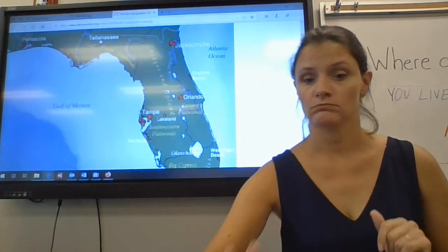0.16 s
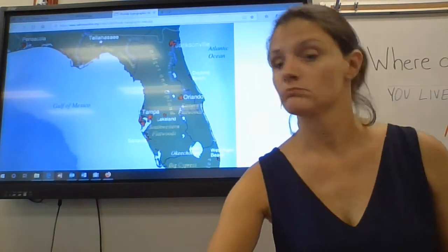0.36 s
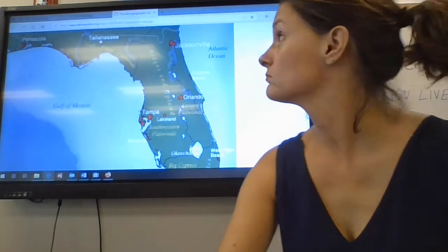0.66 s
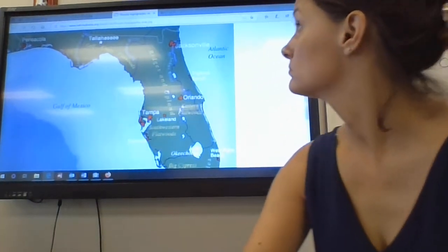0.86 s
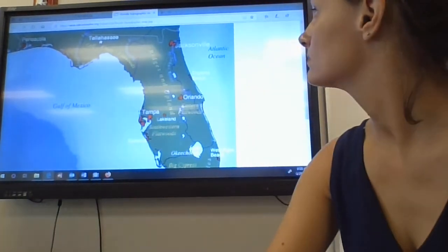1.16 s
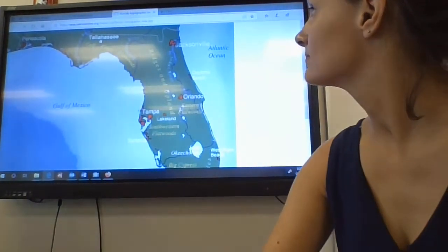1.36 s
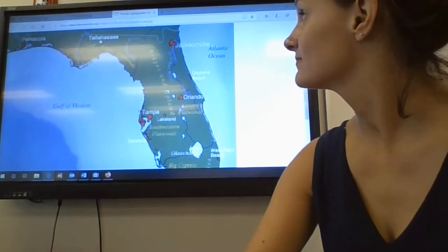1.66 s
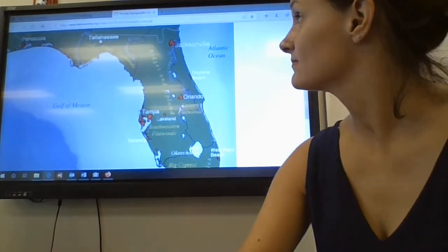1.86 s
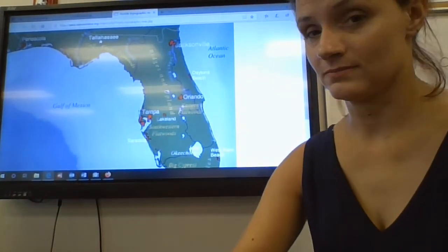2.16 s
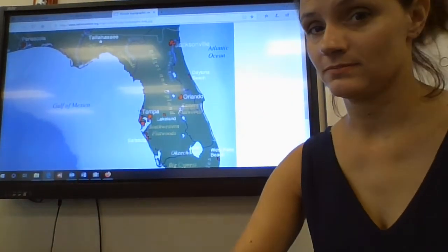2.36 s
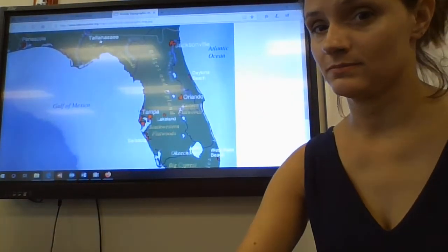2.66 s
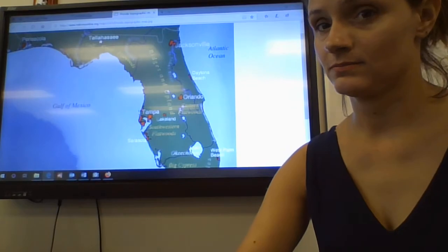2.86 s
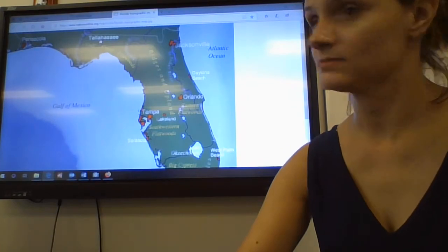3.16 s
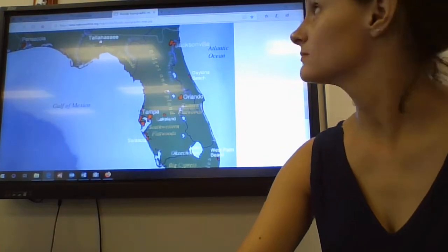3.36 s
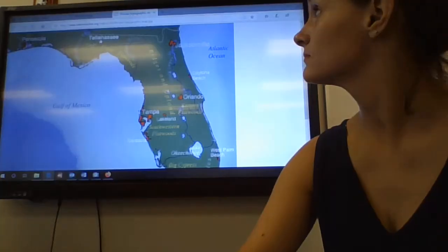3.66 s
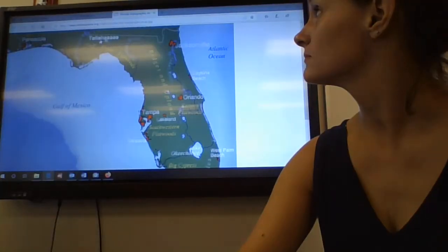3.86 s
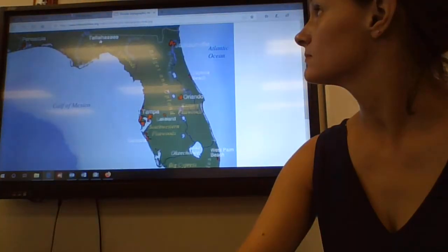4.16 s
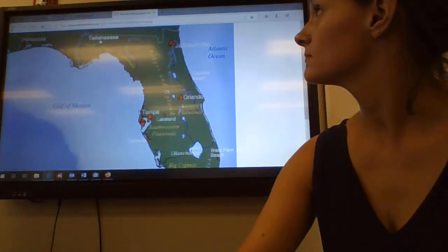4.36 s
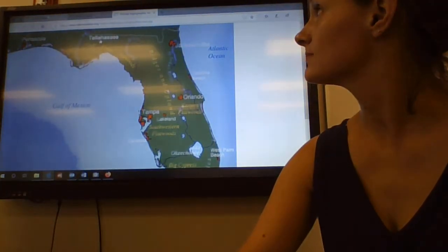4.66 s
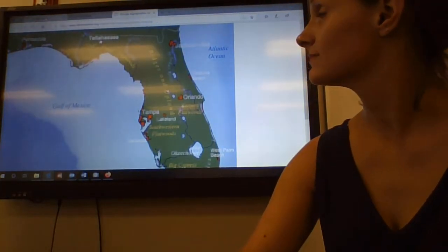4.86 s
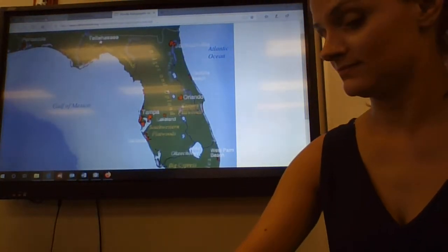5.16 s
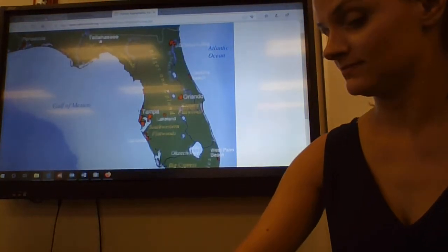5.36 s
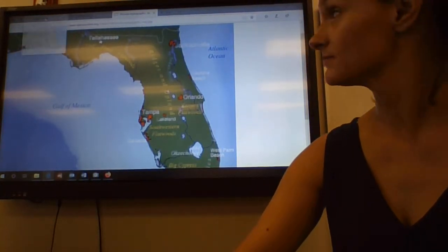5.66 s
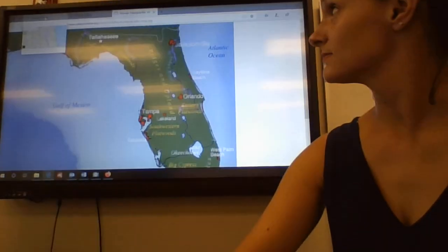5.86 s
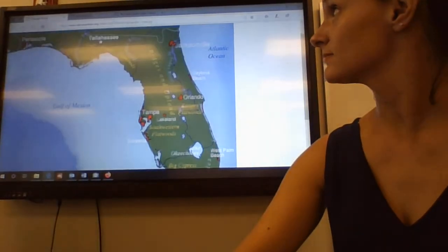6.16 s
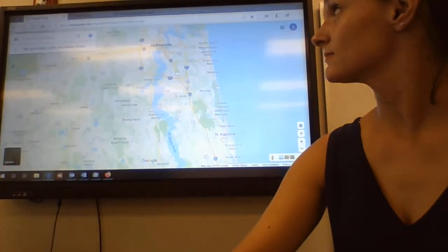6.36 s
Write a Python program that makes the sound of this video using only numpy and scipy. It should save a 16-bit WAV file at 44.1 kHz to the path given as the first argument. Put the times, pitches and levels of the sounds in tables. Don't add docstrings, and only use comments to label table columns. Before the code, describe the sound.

A laptop's own microphone picks up its steady low-mid fan hum, soft airy rush, thin high whine and tiny rapid ticks in a quiet classroom. A hand lightly taps and rubs the case, with dull thuds around one, two and three seconds. After a quieter stretch, a small snap leads to a loud, sharp double knock near the end, then the fan continues.

```python
import sys
import numpy as np
from scipy import signal
from scipy.fft import rfft, irfft, next_fast_len
from scipy.io import wavfile
from scipy.ndimage import uniform_filter1d, map_coordinates

SR = 44100
rng = np.random.default_rng(int(sys.argv[2]) if len(sys.argv) > 2 else 0)


def digitize_waveform(pressure):
    field = np.atleast_2d(pressure).T
    bounded = np.clip(field, -1, 1)
    quanta = np.round(bounded * 32767).astype(np.int16)
    wavfile.write(sys.argv[1], SR, quanta)


def boost_factor(decibels):
    exponent = np.asarray(decibels, float) / 20
    return 10 ** exponent


N = 287532


def unit(x):
    return x / np.sqrt(np.mean(x ** 2) + 1e-20)


def wobble(rate):
    knots = rng.standard_normal(int(N * rate / SR) + 4)
    return map_coordinates(knots, [np.arange(N) * rate / SR])


def filtered(x, response):
    m = next_fast_len(N + SR // 2)
    hz = np.fft.rfftfreq(m, 1 / SR)
    return irfft(rfft(x, m) * response(hz), m)[:N]


def resonances(peaks):
    def response(f):
        total = 0
        for k, (hz, width, db) in enumerate(peaks):
            total = total + (-1) ** k * boost_factor(db) * 1j * f * width / (hz * hz - f * f + 1j * f * width)
        return total
    return response


def rise_and_ring(t, rise_s, t60_s, db):
    return boost_factor(db - 60 * t / t60_s) * (1 - np.exp(-t / rise_s)) ** 2


def fan_tones():
    # time_s, pitch_hz
    fan_speed = [(0, 282.7), (.7, 282.6), (1.1, 281.1), (1.5, 281.8), (2.0, 281.2), (2.6, 282.6),
                 (3.1, 281.2), (3.6, 281.6), (4.3, 281.7), (4.9, 280.3), (5.5, 281.6), (6.52, 281.4)]
    # multiple, level_db
    multiples = [(1, -26), (2, -33), (3, -31.5), (4, 0.5), (5, -23.5), (6, -14.5), (7, -20), (8, -13),
                 (9, -24), (10, -40), (11, -32.5), (12, -21), (13, -21), (14, -35), (15, -29), (16, -40.5),
                 (17, -37)]
    time_s, pitch_hz = np.transpose(fan_speed)
    fourth_hz = np.interp(np.arange(N) / SR, time_s, pitch_hz) + 0.5 * wobble(6.9)
    turn = 2 * np.pi * np.cumsum(fourth_hz) / (4 * SR)
    tones = np.zeros(N)
    for k, db in multiples:
        tones += boost_factor(db + 0.8 * wobble(8.4)) * np.sin(k * turn + rng.uniform(0, 2 * np.pi))
    return boost_factor(-49.5) * tones


def air_rush():
    # pitch_hz, level_db (per Hz)
    air_colour = [(32, -13.5), (55, -20), (90, -5.5), (150, -3), (230, -2), (450, -2), (700, -8),
                  (1050, -11), (1350, -14), (2500, -19), (2900, -25.5), (6000, -32.5), (11000, -32.5),
                  (14500, -29.5)]
    hz, db = np.transpose(air_colour)
    noise = rng.standard_normal(N)
    air = unit(filtered(noise, lambda f: boost_factor(np.interp(np.log(f + 1), np.log(hz), db))))
    return boost_factor(-64.5 + 0.604 * wobble(6.6)) * air


def converter_whine():
    phase = 2 * np.pi * 14446 * np.arange(N) / SR + 0.3 * wobble(30)
    return boost_factor(-83 + 1.1 * wobble(9.5)) * np.sin(phase)


def converter_sizzle():
    _, _, z = signal.stft(rng.standard_normal(N), SR, nperseg=256)
    field = uniform_filter1d(rng.standard_normal(z.shape), size=8, axis=0)
    field = uniform_filter1d(field, size=14, axis=1)
    patches = signal.istft(z * boost_factor(4.8 * unit(field)), SR, nperseg=256)[1][:N]
    return boost_factor(-82.5) * unit(filtered(patches, resonances([(13100, 3800, 0)])))


def electrical_ticks():
    # pitch_hz, width_hz, level_db
    tick_colour = [(3400, 940, 4.5), (4580, 1250, 6), (7360, 660, 8.5), (12100, 1500, -3)]
    clock_hz, due_hz = 185.92, 83.1
    start_s, lag_beats = 3.9005, 0.65
    first, last = -int(start_s * due_hz), int((N / SR - start_s) * due_hz)
    due_s = np.arange(first, last) / due_hz
    beat = np.floor(due_s * clock_hz + lag_beats)
    at = np.round((start_s + beat / clock_hz) * SR).astype(int)
    scatter_db = 1.2 * rng.standard_normal((len(at), 2))
    size = boost_factor(-56 + scatter_db) * rng.choice([-1, 1], (len(at), 2))
    spikes = np.zeros(N + 64)
    spikes[at] = size[:, 0]
    spikes[at + 14] = 0.42 * size[:, 1]
    return filtered(spikes[:N], resonances(tick_colour))


def gain():
    # start_s, lift_db, fade_s
    lifts = [
        (.15, 5, 0.15),
        (.94, 4, 0.28),
        (2.32, 3.5, 0.19),
        (3.32, 4.5, 0.18),
        (5.236, 4.5, 0.17),
        (5.92, -2, 1),
    ]
    react_s = 0.01
    t = np.arange(N) / SR
    level_db = -0.33
    for s, db, fade in lifts:
        level_db = level_db + db * np.interp(t - s, [0, react_s, react_s + fade], [0, 1, 0])
    return boost_factor(level_db)


def clicks():
    # (start_s, level_db)
    cracks = [
        ("edge", [(5.683, -60), (5.815, -52.5), (5.8215, -27.5), (5.9135, -54.5)]),
        ("key", [(.155, -60), (5.351, -63), (5.8215, -32.5), (5.830, -27)]),
        ("pad", [(.162, -57), (2.326, -69.5), (5.916, -70)]),
        ("hinge", [(2.323, -74), (3.325, -70)]),
        ("spring", [(5.256, -58), (5.8222, -50)]),
        ("latch", [(5.8217, -45.5), (5.831, -50)]),
        ("snap", [(5.2495, -38)]),
    ]
    part_sounds = {"edge": (580, 2400, .024), "key": (1400, 3500, 0.019), "pad": (1500, 3100, .05),
                   "hinge": (1800, 14000, .08), "spring": (3300, 9500, 0.02), "latch": (6300, 13000, .010),
                   "snap": (770, 18000, 0.0018)}
    out, t = np.zeros(N + SR), np.arange(SR // 20) / SR
    for part, snaps in cracks:
        low_hz, top_hz, t60 = part_sounds[part]
        band = signal.butter(3, [low_hz, min(top_hz, 20000)], btype="band", fs=SR, output="sos")
        length_scale = np.sqrt(t60 / t[-1] / np.log(1e6))
        for s, db in snaps:
            burst = boost_factor(-60 * t / t60) * (1 - np.exp(-t / 0.00021)) * rng.standard_normal(len(t))
            out[round(s * SR):][:len(t)] += boost_factor(db) * length_scale * unit(signal.sosfilt(band, burst))
    return out[:N]


def thin_lows(x):
    return filtered(x, lambda f: (1j * f / (34.7 + 1j * f)) ** 2)


def raps():
    # pitch_hz, level_db, t60_s, rise_s
    case_tones = [
        [(238.5, 4.5, 0.044, 0.0024), (276.4, 0, 0.052, 0.0067)],
        [(386.5, 3.5, 0.025, 0.0019), (711, -9.5, 0.041, 0.0018)],
        [(577, -1, 0.035, 0.0025), (450, -4.5, 0.012, 0.0018)],
        [(1061, -16, 0.04, 0.001), (1139, -2.5, 0.019, 0.0016)],
        [(1318, 0.5, 0.0096, 0.00084), (1724, -6.5, 0.0096, 0.00046)],
    ]
    # start_s, peak_db, hardness_db (per octave), place (fraction across the case)
    rap_times = [(0.156, -44.5, 11.5, 0.33), (.598, -45.5, -10, 0.41), (0.765, -48, -10, 0.48),
                 (2.3215, -38, -8, .48), (3.3238, -37, 0, 0.365), (3.83, -65, -1, .46),
                 (5.35, -45.5, 10.5, 0.22), (5.6834, -46, -4.5, 0.41), (5.825, -23.5, 5, 0.2),
                 (5.8303, -5, 2, .28), (5.836, -16.5, -2.5, .3), (5.908, -37.5, 1.5, .17),
                 (5.9133, -15.5, -3.5, 0.461), (5.926, -32, -12.5, 0.089)]
    shape_db = [-1.5, 1.85, 2.6, 2.54, -9]
    out, t = np.zeros(N + SR), np.arange(SR // 3) / SR
    for k, family in enumerate(case_tones):
        ring = np.zeros(len(t))
        for hz, db, t60, rise in family:
            ring += rise_and_ring(t, rise, t60, db + 9) * np.sin(2 * np.pi * hz * t)
        octaves = np.log2(family[0][0] / 500)
        for s, db, hardness, place in rap_times:
            movement = np.sqrt(np.sin(np.pi * (k + 1) * place) ** 2 + 0.02)
            out[round(s * SR):][:len(t)] -= boost_factor(db + shape_db[k] + hardness * octaves) * movement * ring
    return thin_lows(out[:N])


def rubbing():
    # start_s, length_s, shell_db, squeak_db
    strokes = [
        (0.57, 0.2, -69, -74.5),
        (0.937, 0.082, -49.5, -58.5),
        (1.02, 0.098, -62.5, -84),
        (0.976, 0.37, -64, -91),
        (1.687, 0.15, -65.5, -90),
        (2.777, 0.11, -63, -87),
        (2.85, 0.08, -69, -87),
        (3.56, .24, -68.5, -95),
        (3.79, .22, -68, -92),
    ]
    # pitch_hz, width_hz, level_db
    shell_colour = [(160, 78, -3.5), (386, 200, -5.5), (1068, 68, -0.5), (1367, 40, -7)]
    # pitch_hz, width_hz, level_db
    squeak_colour = [(1755, 77, 7), (2070, 39, 8.5), (2530, 230, 7), (3770, 220, 2), (4250, 240, 2),
                     (4700, 300, -5), (7300, 1000, -4), (11100, 900, -8)]
    t = np.arange(N) / SR
    shell_level, squeak_level = np.zeros(N), np.zeros(N)
    for s, length, shell_db, squeak_db in strokes:
        press = abs(np.sin(np.pi * np.clip((t - s) / length, 0, 1)))
        shell_level += boost_factor(shell_db) * press
        squeak_level += boost_factor(squeak_db) * press
    grains = rng.standard_normal(N) * boost_factor(3.4 * wobble(120))
    shell = unit(filtered(grains, resonances(shell_colour)))
    squeak = unit(filtered(grains, lambda f: resonances(squeak_colour)(f) ** 2))
    return shell_level * shell + squeak_level * squeak


def thuds():
    # pitch_hz, level_db, t60_s
    desk_tones = [(80, 9, 0.18), (118.4, -2.5, 0.23)]
    # start_s, peak_db, pitch_hz, desk_db (over the thud)
    thud_times = [(0.602, -18.5, 115.6, -19), (0.764, -31, 138, -37), (.767, -46.5, 384, -40),
                  (1.239, -46.5, 131, -8), (2.325, -22.5, 103, -26), (2.626, -46, 137, -26),
                  (2.908, -54, 140, -13), (3.3243, -23.5, 215, -45), (3.330, -15, 119, -24.5),
                  (3.83, -32, 128, -31), (4.578, -39.5, 128, -22), (4.80, -57, 120, -26),
                  (5.354, -42, 120, -11), (5.688, -28.5, 119, -25), (5.831, -13.5, 208, -34),
                  (5.833, -15.5, 106, -20.5), (5.875, -42.5, 235, -26.5), (5.913, -3.5, 187.3, -36.5),
                  (5.915, -20, 450, -50), (5.918, -10, 114, -21)]
    bounce_s, bounce_db = 0.027, -24.5
    out, t = np.zeros(N + SR), np.arange(SR // 3) / SR
    desk = np.zeros(len(t))
    for hz, db, t60 in desk_tones:
        desk += rise_and_ring(t, 0.021, t60, db) * np.sin(2 * np.pi * hz * t)
    for s, db, hz, desk_db in thud_times:
        cycles = hz * (t + 0.41 * 0.0053 * (1 - np.exp(-t / 0.0019)))
        thud = rise_and_ring(t, 0.63 / hz, 0.036, 13.5) * np.sin(2 * np.pi * cycles)
        out[round(s * SR):][:len(t)] += boost_factor(db) * (thud + boost_factor(desk_db) * desk)
        out[round((s + bounce_s) * SR):][:len(t)] += boost_factor(db + bounce_db) * thud
    return thin_lows(out[:N])


def scene():
    steady = fan_tones() + air_rush() + converter_whine() + converter_sizzle() + electrical_ticks()
    handling = clicks() + raps() + rubbing() + thuds()
    return (gain() * steady + handling)[None]


def treble_dropouts(x):
    dull_frames = [2, 40, 76, 81, 86, 93, 116, 142, 150, 163, 196, 197, 210, 225, 228, 257, 261, 262, 284,
                   303, 304]
    frame_s, lag_frames, dull_hz = 1024 / 48000, 0.09, 2700
    hz, t, z = signal.stft(x, SR, nperseg=256)
    kept = np.ones(z.shape[1:])
    for frame in dull_frames:
        fade = np.cos(np.pi / 2 * np.clip(t / frame_s - frame - lag_frames, -1, 1)) ** 2
        chance = 0.02 + 1 / (1 + (hz / dull_hz) ** 8)
        spared = (abs(hz - 14446) < 200) | (rng.random(len(hz)) < chance)
        kept = kept - np.outer(~spared, fade)
    z = z * kept * (hz[:, None] < 15700)
    return signal.istft(z, SR, nperseg=256)[1][:, :N]


def band_limit(x):
    return signal.sosfilt(signal.butter(12, 16470, fs=SR, output="sos"), x)


def record(dry):
    x = treble_dropouts(dry)
    mix = x / (1 + abs(x / 1.05) ** 8) ** (1 / 8)
    return band_limit(mix)


dry = scene()
out = record(dry)
digitize_waveform(out)
```